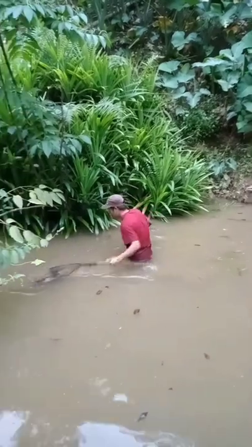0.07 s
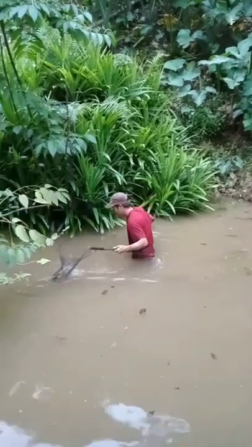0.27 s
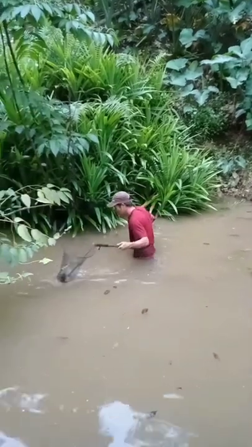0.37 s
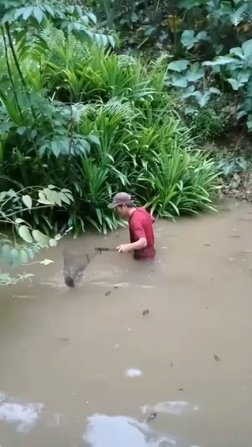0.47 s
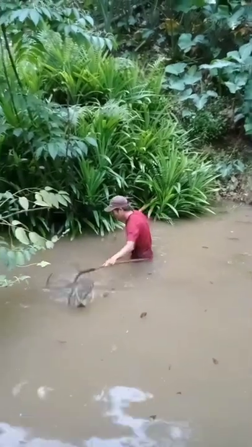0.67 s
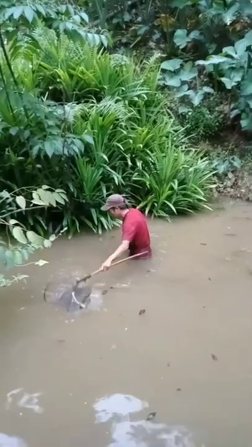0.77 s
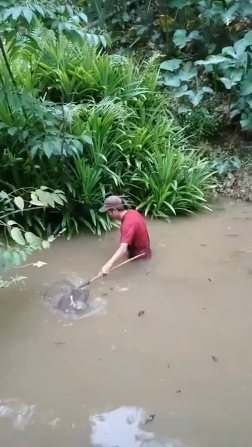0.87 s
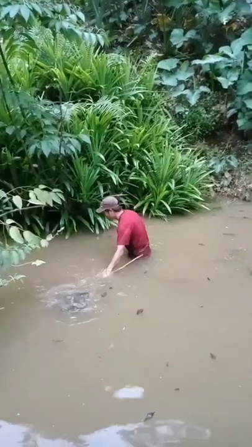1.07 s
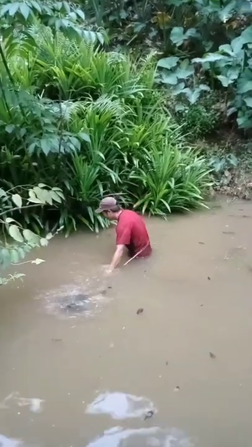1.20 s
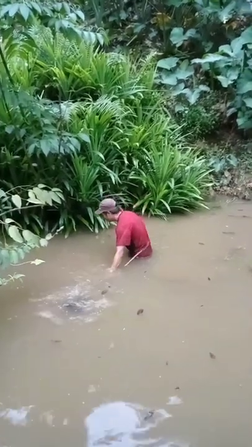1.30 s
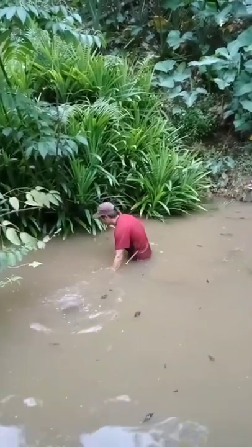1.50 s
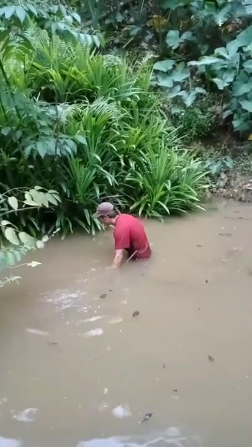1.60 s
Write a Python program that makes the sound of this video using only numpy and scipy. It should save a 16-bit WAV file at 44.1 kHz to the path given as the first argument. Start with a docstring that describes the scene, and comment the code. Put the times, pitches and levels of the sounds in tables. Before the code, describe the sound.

Water dribbles and plops from a hand net lifted out of a pond, then splashes as the net plunges back in. Bubbles and drops follow, a few metres away, over soft outdoor air and faint insects.

```python
"""Water dribbles and plops, then splashes: a few metres away, a hand net is lifted out of a muddy pond
and plunged back in. Trapped air rings as rising bubbles over a low gurgle and slosh. Thrown water
patters and fizzes, and single drops tick and smack on the surface. Behind it are soft outdoor air
and insects hissing steadily in the plants of the bank, which returns a faint echo of the water."""
import sys
import numpy as np
from scipy import signal
from scipy.fft import rfft, irfft, next_fast_len
from scipy.io import wavfile
from scipy.ndimage import map_coordinates

SR = 44100
rng = np.random.default_rng(int(sys.argv[2]) if len(sys.argv) > 2 else 0)


def pcm_store(signal):
    """Save signal as 16-bit PCM."""
    levels = np.round(np.clip(np.atleast_2d(signal), -1, 1) * 32767)
    wavfile.write(sys.argv[1], SR, levels.astype(np.int16).T)


N = 72765

# Tone of the outdoor air. Each row: frequency in Hz, relative level in dB.
AIR_SPECTRUM = [(25, -44), (60, -4), (110, -1), (750, -7.5), (1000, -5), (3100, -8.5), (6200, -15.5),
                (8000, -16.5), (9300, -10), (12500, -14), (15300, -8.5)]
# Voices of the insect chorus. Each row: centre in Hz, half width in Hz, level in dB.
INSECT_BANDS = [(3145, 310, -69.5), (4573, 390, -65.5), (5206, 314, -66), (7063, 240, -72.5),
                (9140, 540, -73.5)]
# Swell of the whole chorus. Each row: time in seconds, gain in dB.
INSECT_SWELL = [(0, 1), (.3, 2), (1.37, 2.5), (1.47, -3), (1.57, 1), (1.65, -2)]
# Low wash of displaced water. Each row: time in seconds, level in dB.
SLOSH_LEVELS = [(0, -80.5), (.27, -70.5), (.66, -73), (.85, -78), (.95, -72.5), (1.4, -85)]
# Hollow tone of that wash. Each row: centre in Hz, half width in Hz, gain in dB.
SLOSH_BANDS = [(150, 30.5, -1.5), (308, 58, 2.5)]
# Underwater churning, water falling from or thrown by the net, and fine spray with bursting foam.
# Each row: time in seconds, level in dB.
GURGLE_LEVELS = [(0, -70.5), (.22, -74.5), (.28, -59), (.34, -67.5), (.58, -68), (.635, -55), (.72, -57.5),
                 (.82, -67), (.88, -59.5), (.91, -65.5), (.94, -45.5), (1.01, -54.5), (1.06, -67),
                 (1.14, -60), (1.25, -54.5), (1.3, -67), (1.65, -79.5)]
PATTER_LEVELS = [(0, -67.5), (.115, -63.5), (.2, -65), (.25, -55), (.33, -57), (.59, -56.5), (.625, -51.5),
                 (.695, -59), (.72, -52), (.81, -56), (.88, -53), (.912, -52.5), (.936, -42), (.978, -42),
                 (1.0, -57), (1.06, -53.5), (1.11, -55.5), (1.23, -55), (1.29, -71.5), (1.65, -71.5)]
SPRAY_LEVELS = [(0, -75.5), (.25, -64.5), (.56, -68), (.62, -61.5), (.69, -68.5), (.86, -60.5),
                (.922, -58.5), (.94, -48.5), (.975, -48.5), (1.0, -60), (1.06, -62.5), (1.13, -55),
                (1.19, -68), (1.215, -52.5), (1.27, -82), (1.65, -86)]
# Tone of the gurgle, the patter, the spray (and ticking drops), and the heavy drops.
# Each row: frequency in Hz, relative level in dB.
GURGLE_SPECTRUM = [(200, -18.5), (420, -7.5), (680, 1.5), (840, 1.5), (1000, -7), (2500, -71)]
PATTER_SPECTRUM = [(300, -48.5), (800, 6), (1080, -11), (1400, -6.5), (1700, -4), (2250, 2.5), (2700, -4),
                   (3300, 2.5), (4400, 0), (5300, -12), (6200, -6.5), (15000, -84)]
SPRAY_SPECTRUM = [(2500, -48), (5000, -0.5), (6500, -16), (7800, -6.5), (9300, 3.5), (10300, 0),
                  (12200, -9), (15300, -10)]
SPLAT_SPECTRUM = [(900, -22.5), (1900, -4), (4100, 0), (7000, -30)]
# Light drops ticking and heavy drops smacking the pond. Each row: start in seconds, peak level in dB.
LIGHT_DROPS = [(.606, -49), (0.7223, -45), (.888, -40.5), (1.2053, -39), (1.2105, -40), (1.231, -38.5),
               (1.579, -49)]
HEAVY_DROPS = [(.114, -49), (.4972, -43), (.7535, -45), (1.079, -36.5), (1.0835, -40)]
# Large single bubbles. Each row: start in seconds, starting pitch in Hz, gain in dB,
# life in seconds, rise in octaves per second.
LARGE_BUBBLES = [(.2155, 2060, -47, .016, 0), (.239, 232, -42.5, .108, 25.5), (.4698, 3130, -41.5, .014, 0),
                 (.497, 1345, -36, .019, 8), (.543, 680, -38.5, .028, 8), (.552, 1400, -50, .03, 25),
                 (.6175, 690, -43, .013, 10), (.626, 750, -43.5, .025, 3), (.644, 1480, -47, .02, 5),
                 (.6665, 570, -45, .045, 4), (.7035, 570, -45, .035, 18), (.7222, 2720, -39.5, .016, 4),
                 (.7555, 2280, -37, .01, 10), (.767, 265, -55, .08, 3), (.8754, 2430, -45, .014, 5),
                 (.922, 715, -41, .035, 2), (.930, 2020, -40, .022, 5), (.938, 390, -40, .055, 5),
                 (.942, 3300, -38, .018, 0), (.948, 2350, -36, .012, 5), (.9585, 2100, -39, .02, 8),
                 (.9705, 590, -37, .035, 3), (.9792, 4300, -37, .009, 0), (.993, 550, -46, .07, 6),
                 (1.0787, 3220, -34, .014, 0), (1.080, 2190, -46, .045, 0), (1.099, 720, -45, .025, 0),
                 (1.0995, 395, -42.5, .068, 1.5), (1.232, 345, -41.5, .042, 14),
                 (1.2533, 1370, -41, .03, 17), (1.254, 560, -43, .055, 15)]


def amp(db):
    """Decibels to gain."""
    return 10 ** (np.asarray(db) / 20)


def unit_rms(x):
    """Scale to rms 1."""
    return x / np.sqrt(np.mean(x ** 2) + 1e-20)


def fade(t, t60):
    """Exponential decay, down 60 dB at t60."""
    return np.exp(-np.log(1000) * t / t60)


def fader(rows):
    """Gain per sample, riding through rows of seconds and dB."""
    return amp(np.interp(np.arange(N) / SR, *np.transpose(rows)))


def wobble(knots_per_s):
    """A smooth curve through a loop of random knots."""
    return map_coordinates(rng.standard_normal(200), [np.arange(N) * knots_per_s / SR], mode="wrap")


def filtered(x, response):
    """Filter x by a gain given as a function of Hz."""
    size = next_fast_len(len(x) + SR // 2)
    return irfft(rfft(x, size) * response(np.fft.rfftfreq(size, 1 / SR)), size)[:len(x)]


def coloured(x, spectrum):
    """Equalise x to rms 1, with minimum phase so that attacks stay crisp."""
    points_hz, points_db = np.transpose(spectrum)

    def response(hz):
        gain = amp(np.interp(np.log(hz + 1), np.log(points_hz), points_db))
        cepstrum = irfft(np.log(gain))
        cepstrum[1:len(cepstrum) // 2] *= 2
        cepstrum[len(cepstrum) // 2 + 1:] = 0
        return np.exp(rfft(cepstrum))
    return unit_rms(filtered(x, response))


def noise_band(centre, half_width):
    """A narrow band of noise at rms 1."""
    noise = rng.standard_normal(N)
    return unit_rms(filtered(noise, lambda hz: 1 / (1 + ((hz - centre) / half_width) ** 4)))


def add(track, start_s, sound):
    """Mix a sound in at its start time."""
    part = track[max(0, round(start_s * SR)):][:len(sound)]
    part += sound[:len(part)]


def bubble_shower(per_s, low_hz, high_hz, cycles, spread_db, rise, samples):
    """A steady shower of small bubbles at rms 1, each ringing for some cycles and bending upward."""
    when, pitch, strength = rng.random((int(per_s * N / SR), 3)).T[:, :, None]
    hz = low_hz * (high_hz / low_hz) ** pitch
    t, life = np.arange(samples) / SR, cycles / hz
    glide = 1 + rise * np.minimum(t / life, 1)
    envelope = fade(t, life) * (1 - np.exp(-2 * hz * t))
    rings = amp(spread_db * strength) * envelope * np.sin(2 * np.pi * hz * t * glide)
    positions = (when * N).astype(int) + np.arange(samples)
    return unit_rms(np.bincount(positions.ravel(), rings.ravel(), N)[:N])


def outdoor_air(level_db=-64):
    """A soft, even bed of broad noise."""
    return amp(level_db) * coloured(rng.standard_normal(N), AIR_SPECTRUM)


def insects(flutter_db=2.3, flutter_per_s=34.96):
    """A distant chorus: narrow bands of hiss that swell together while each flutters on its own."""
    voices = sum(amp(db + flutter_db * wobble(flutter_per_s)) * noise_band(centre, half_width)
                 for centre, half_width, db in INSECT_BANDS)
    return fader(INSECT_SWELL) * voices


def bank_echo(water, gain_db=-16, delay_s=.017, t60_s=.15):
    """The overgrown bank throws back one weak reflection and a short, diffuse tail."""
    t = np.arange(SR // 3) / SR
    echo = rng.standard_normal(len(t)) * fade(t, t60_s) * (t > delay_s)
    echo /= np.linalg.norm(echo)
    echo[round(delay_s * SR)] += 1  # the reflection carries as much energy as the tail
    return amp(gain_db) * signal.fftconvolve(water, echo)[:N]


def slosh():
    """Displaced water washes with a low, hollow sound."""
    wash = sum(amp(db) * noise_band(centre, half_width) for centre, half_width, db in SLOSH_BANDS)
    return fader(SLOSH_LEVELS) * wash


def gurgle():
    """The net stirs up a crowd of low, short-lived bubbles under the surface."""
    crowd = bubble_shower(per_s=500, low_hz=300, high_hz=900,
                          cycles=14, spread_db=10, rise=.2, samples=2200)
    return fader(GURGLE_LEVELS) * coloured(crowd, GURGLE_SPECTRUM)


def drops(rows, spectrum, t60_s):
    """Each falling drop hits the surface with a short burst of noise."""
    track, t = np.zeros(N), np.arange(SR // 30) / SR
    for start, db in rows:
        crack = coloured(rng.standard_normal(len(t)) * fade(t, t60_s), spectrum)
        add(track, start, amp(db) * crack / np.abs(crack).max())
    return track


def splash(wash_db=-3, mist_db=-1.5):
    """Thrown water: a patter of small bubbles and a fizz of tiny pitched droplets, each on smooth noise."""
    patter = bubble_shower(per_s=1800, low_hz=1104, high_hz=5426,
                           cycles=30, spread_db=11.5, rise=.11, samples=1200)
    spray = bubble_shower(per_s=1800, low_hz=5000, high_hz=13700,
                          cycles=36, spread_db=12, rise=.05, samples=320)
    patter = coloured(patter + amp(wash_db) * rng.standard_normal(N), PATTER_SPECTRUM)
    spray = coloured(spray + amp(mist_db) * rng.standard_normal(N), SPRAY_SPECTRUM)
    return fader(PATTER_LEVELS) * patter + fader(SPRAY_LEVELS) * spray


def large_bubbles(attack_cycles=1.1, slap_db=-10, slap_t60_s=.04):
    """Each air pocket closes with a noisy slap and rings; most glide up as they near the surface."""
    track, t = np.zeros(N), np.arange(SR // 8) / SR
    for start, hz, db, life, rise in LARGE_BUBBLES:
        unsteadiness = (1000 / hz) ** .3  # bigger, lower bubbles are less steady
        waver_octaves = .03 * unsteadiness * wobble(knots_per_s=250)[:len(t)]  # the bubble deforms
        pitch = hz * 2 ** (rise * t + waver_octaves)
        decay = fade((t / life) ** 2, .93)  # dies away ever faster
        ring = np.sin(2 * np.pi * np.cumsum(pitch) / SR) * decay
        slap_octaves = .6 * unsteadiness  # width of the noise around the starting pitch
        noise = rng.standard_normal(len(t))
        noise = filtered(noise, lambda f: np.exp(-(np.log2((f + 1) / hz) / slap_octaves) ** 2))
        slap = amp(slap_db) * unit_rms(noise) * fade(t, slap_t60_s)
        attack = 1 - np.exp(-t * hz / attack_cycles)
        add(track, start, amp(db) * attack * (ring + slap))
    return track


def scene():
    """The water and its echo over insects and outdoor air, in mono."""
    ticks = drops(LIGHT_DROPS, SPRAY_SPECTRUM, t60_s=.016)
    splats = drops(HEAVY_DROPS, SPLAT_SPECTRUM, t60_s=.035)
    water = large_bubbles() + ticks + splats + splash() + gurgle() + slosh()
    return (outdoor_air() + water + bank_echo(water) + insects())[None]


def record(dry, cutoff_hz=15550):
    """A brick-wall low-pass takes off the very top of the mix."""
    return np.array([filtered(channel, lambda hz: hz < cutoff_hz) for channel in dry])


dry = scene()
out = record(dry)
pcm_store(out)
```